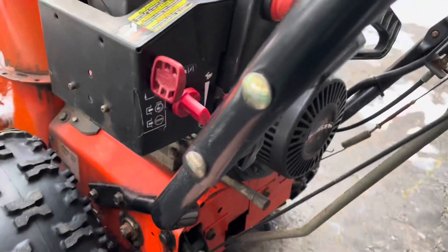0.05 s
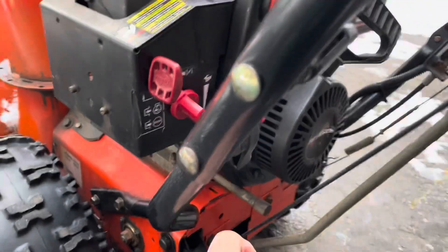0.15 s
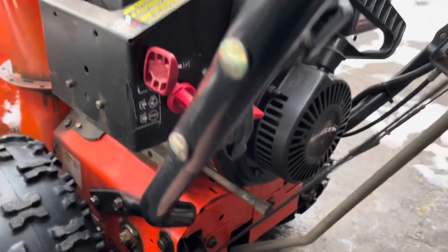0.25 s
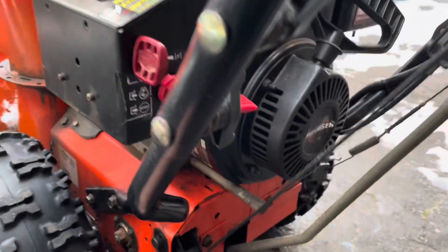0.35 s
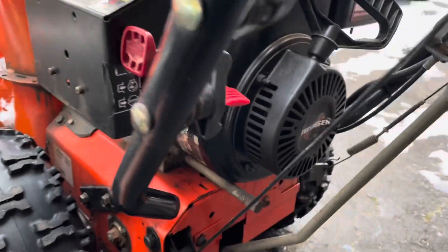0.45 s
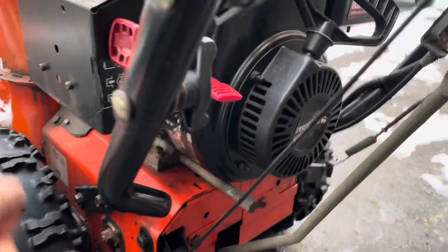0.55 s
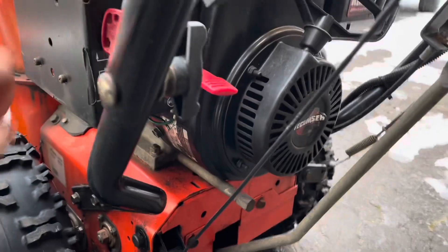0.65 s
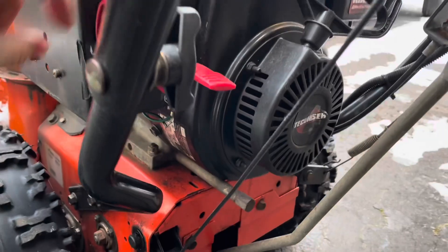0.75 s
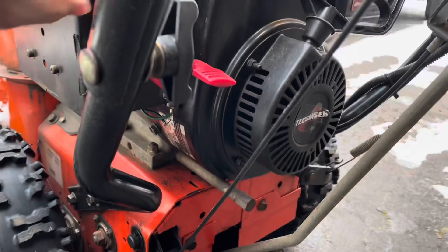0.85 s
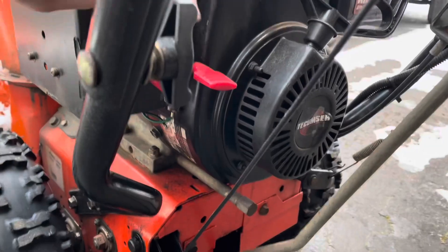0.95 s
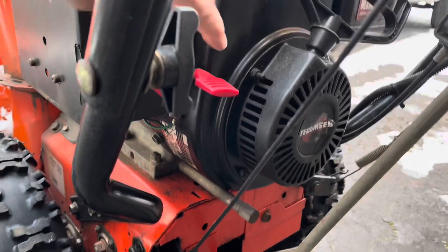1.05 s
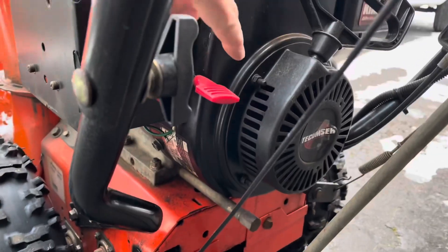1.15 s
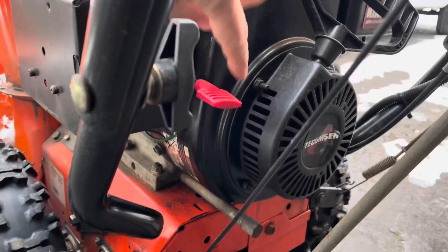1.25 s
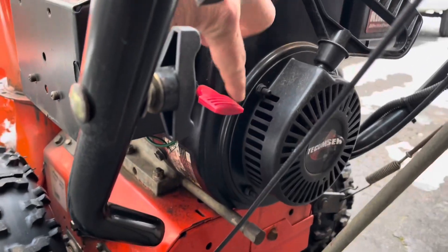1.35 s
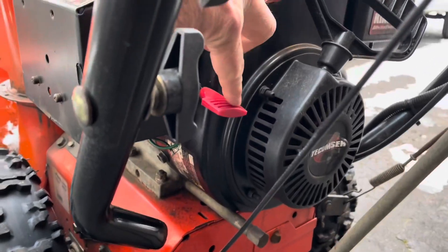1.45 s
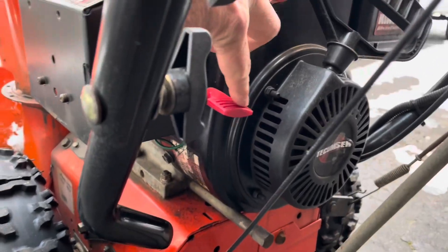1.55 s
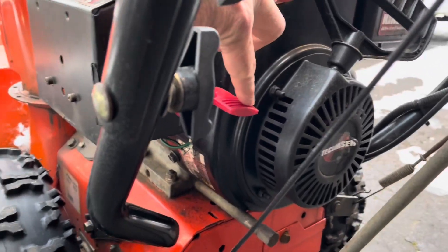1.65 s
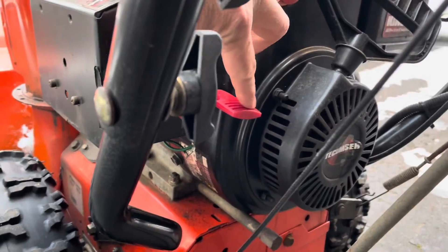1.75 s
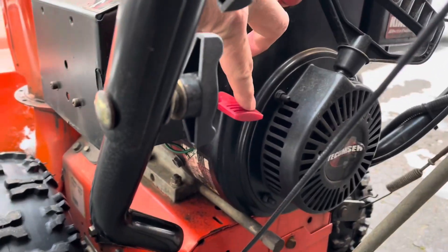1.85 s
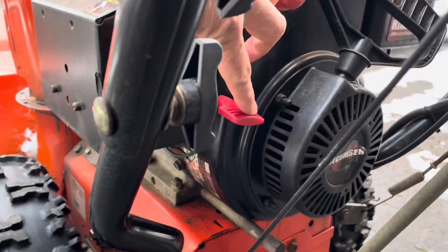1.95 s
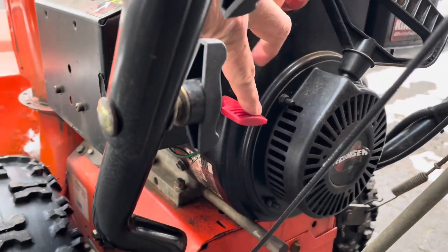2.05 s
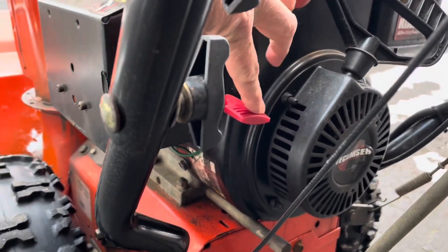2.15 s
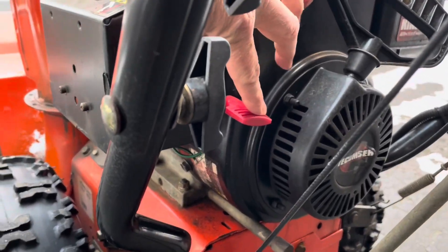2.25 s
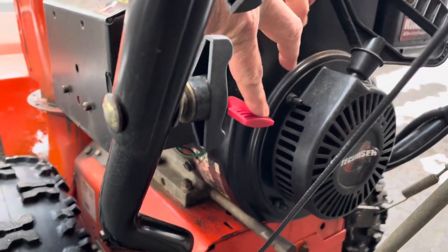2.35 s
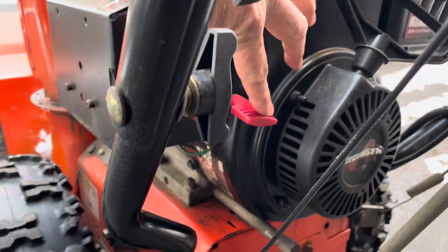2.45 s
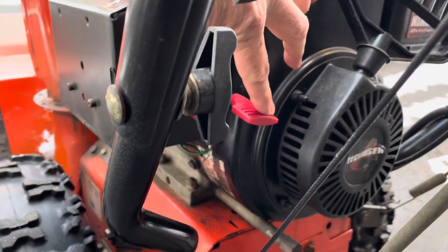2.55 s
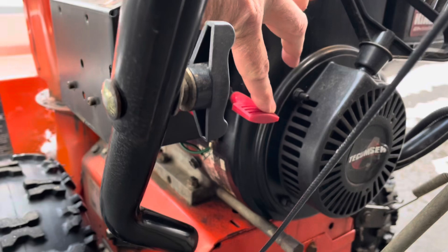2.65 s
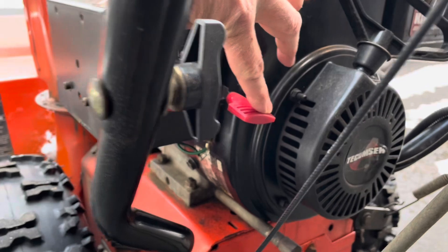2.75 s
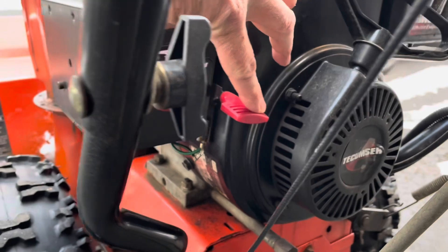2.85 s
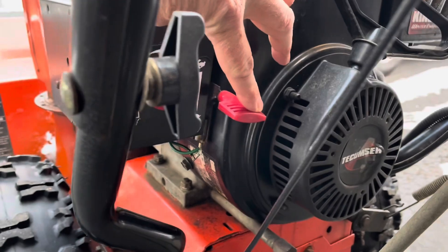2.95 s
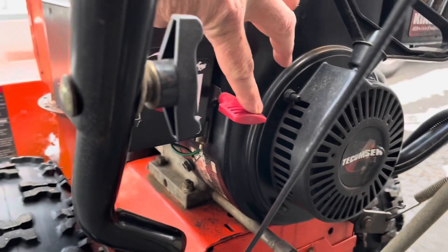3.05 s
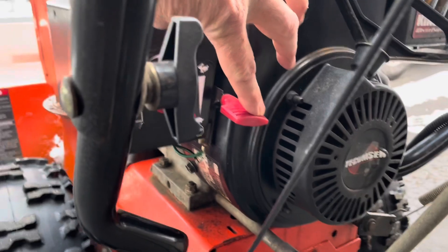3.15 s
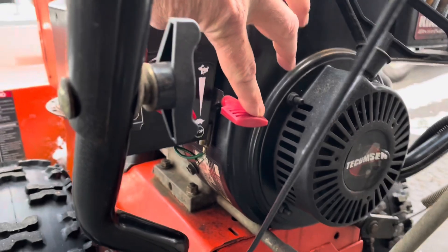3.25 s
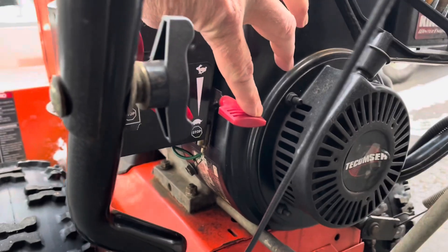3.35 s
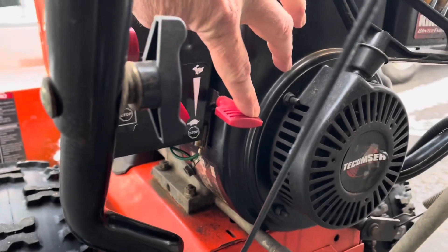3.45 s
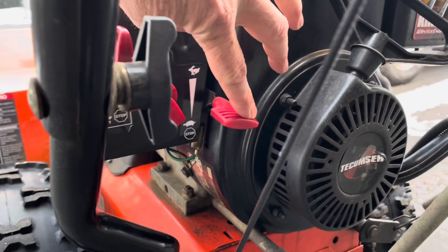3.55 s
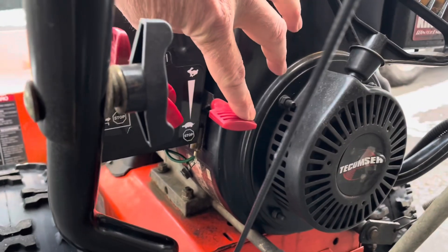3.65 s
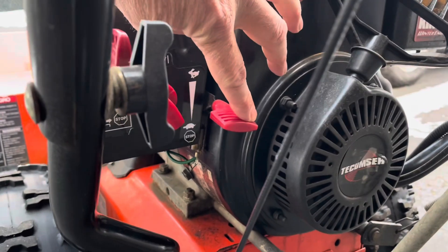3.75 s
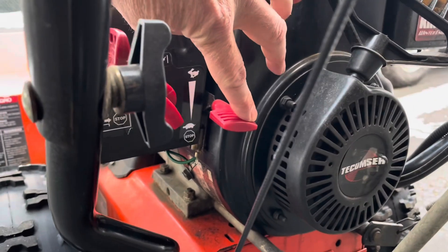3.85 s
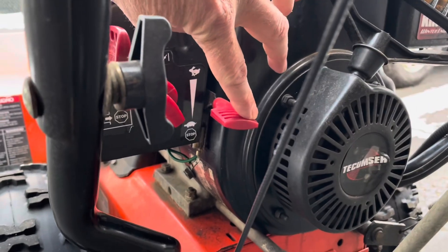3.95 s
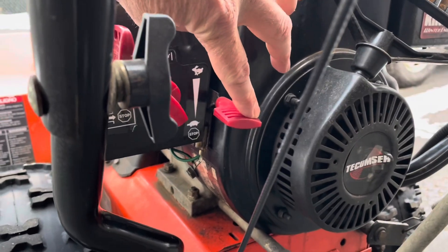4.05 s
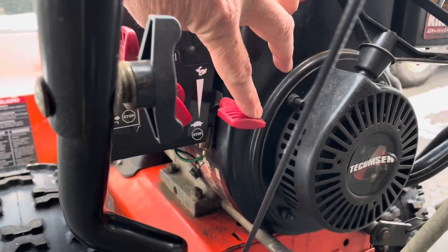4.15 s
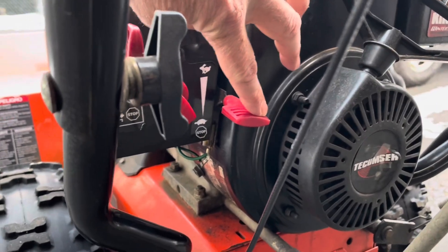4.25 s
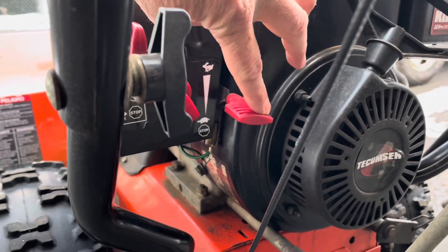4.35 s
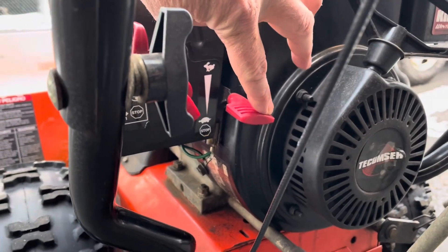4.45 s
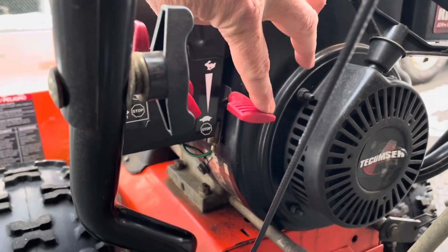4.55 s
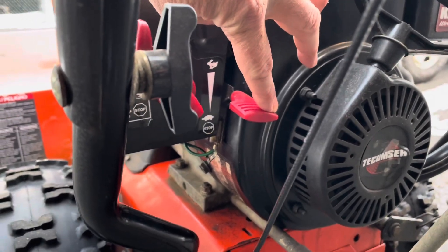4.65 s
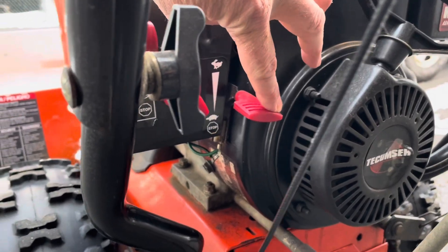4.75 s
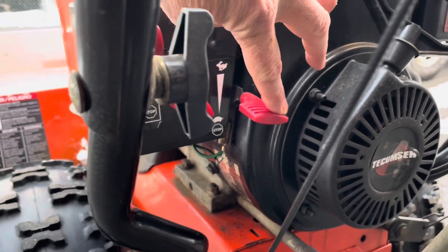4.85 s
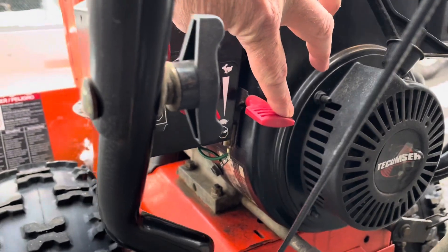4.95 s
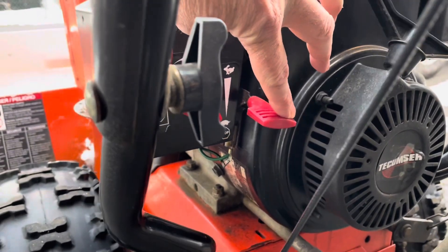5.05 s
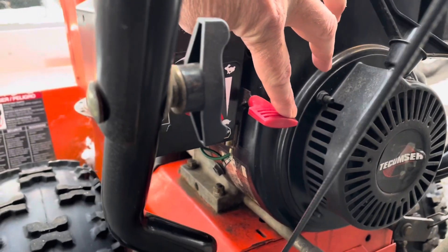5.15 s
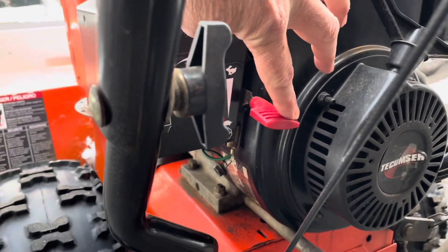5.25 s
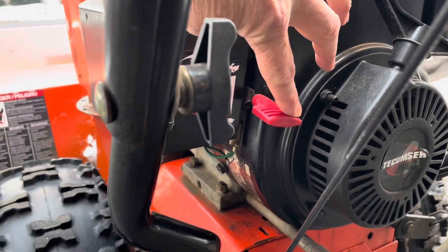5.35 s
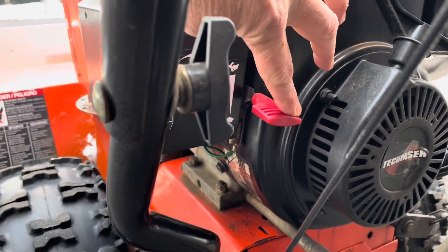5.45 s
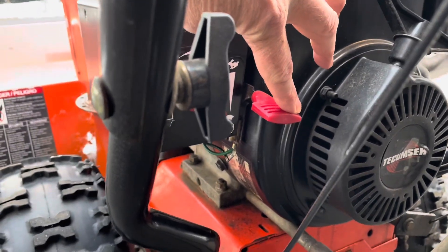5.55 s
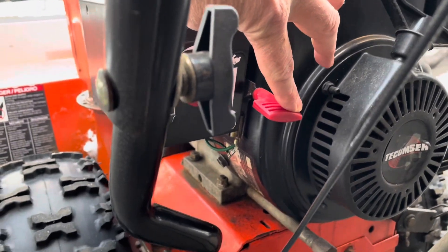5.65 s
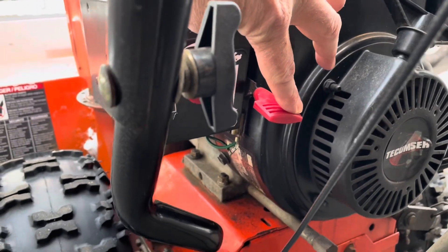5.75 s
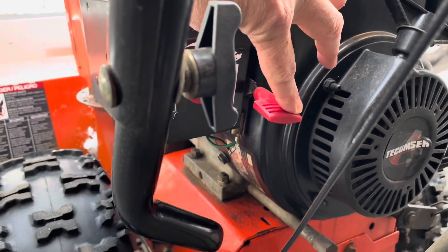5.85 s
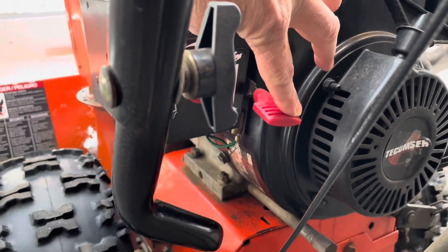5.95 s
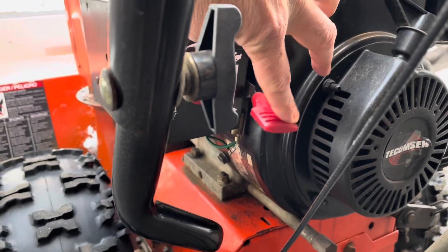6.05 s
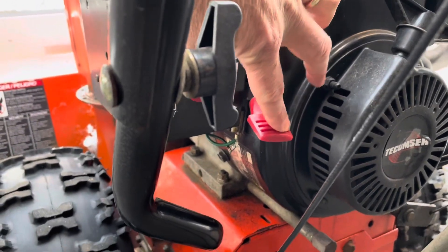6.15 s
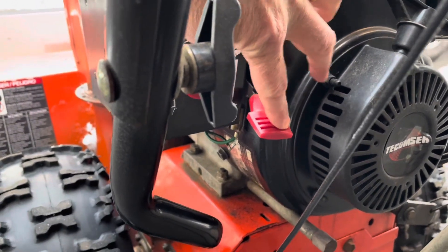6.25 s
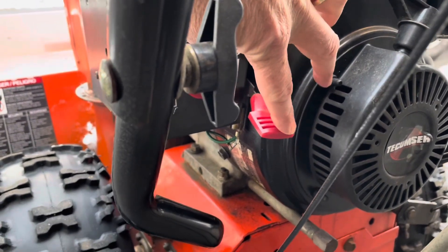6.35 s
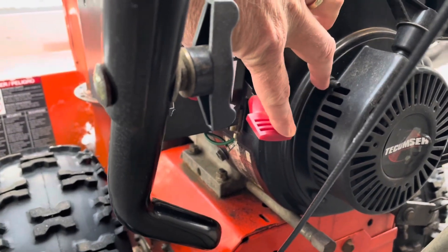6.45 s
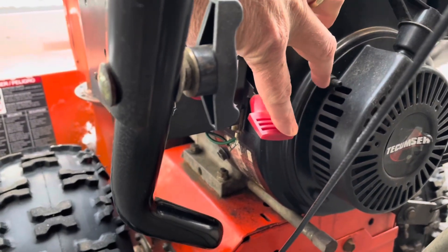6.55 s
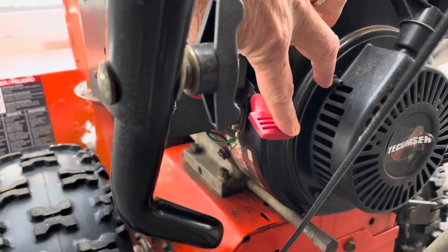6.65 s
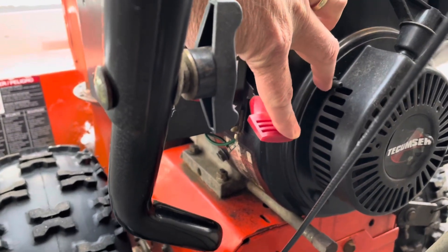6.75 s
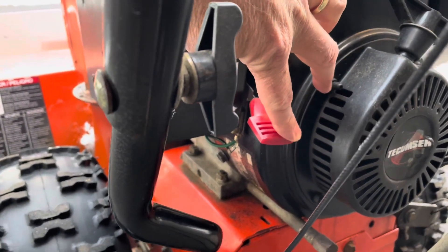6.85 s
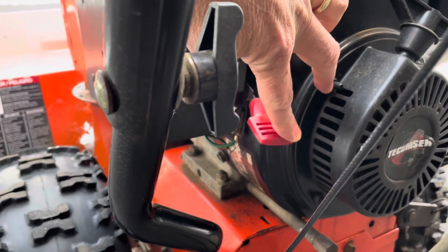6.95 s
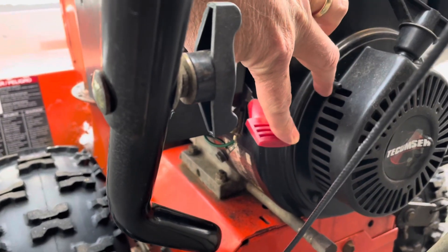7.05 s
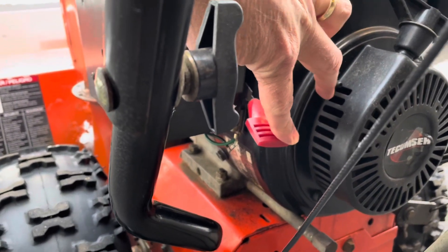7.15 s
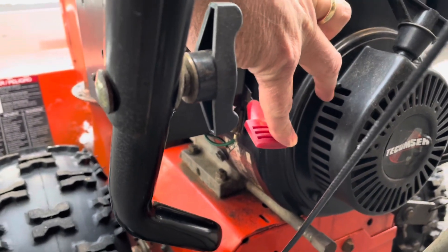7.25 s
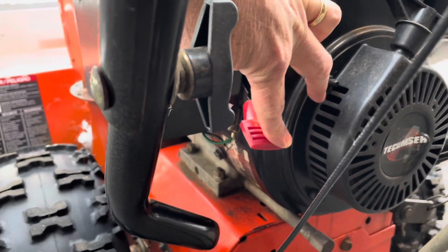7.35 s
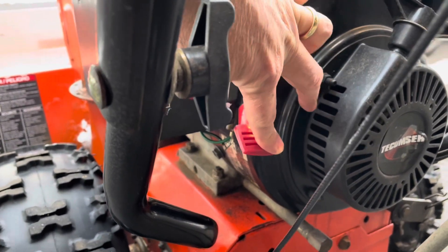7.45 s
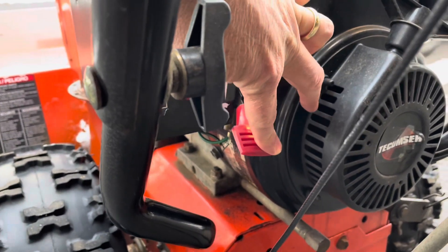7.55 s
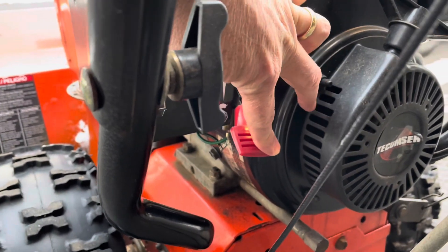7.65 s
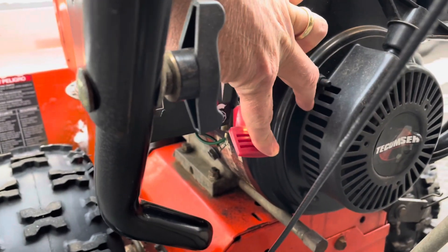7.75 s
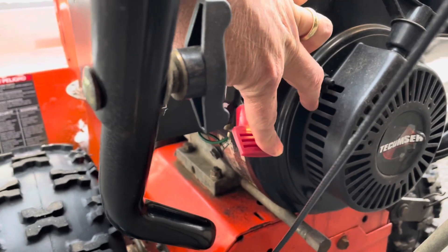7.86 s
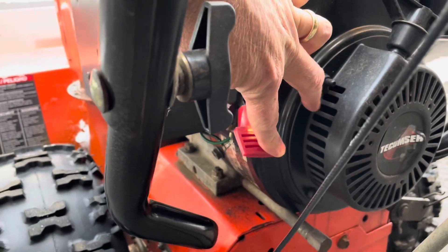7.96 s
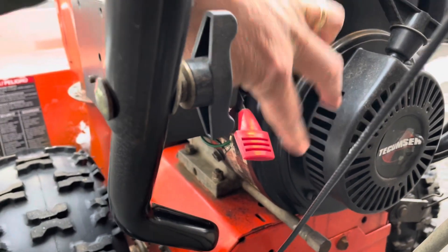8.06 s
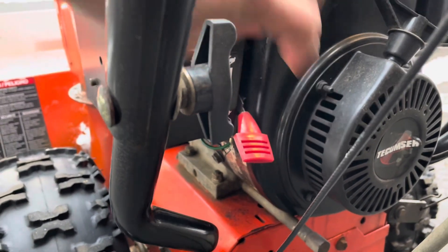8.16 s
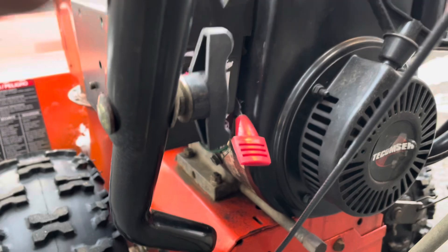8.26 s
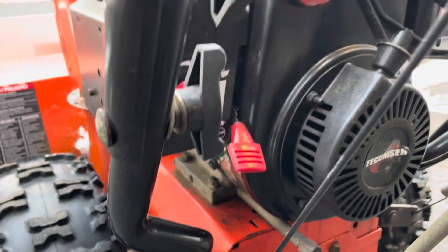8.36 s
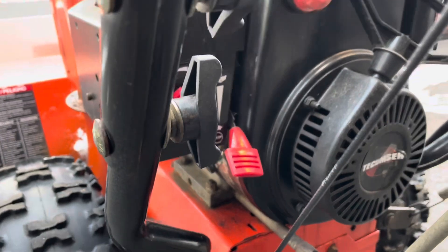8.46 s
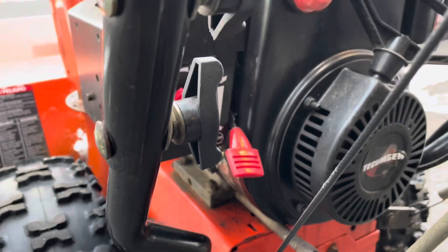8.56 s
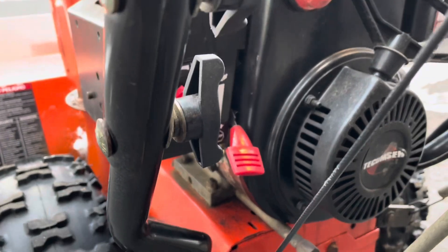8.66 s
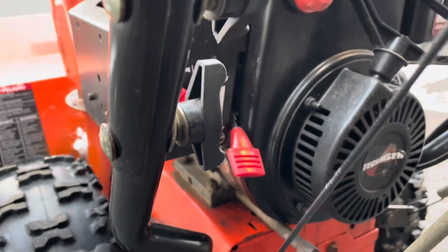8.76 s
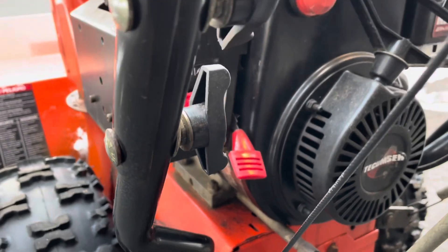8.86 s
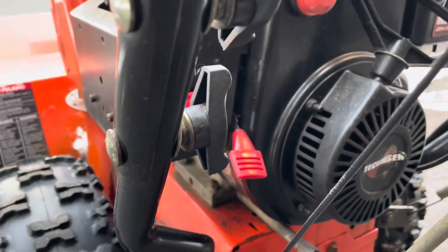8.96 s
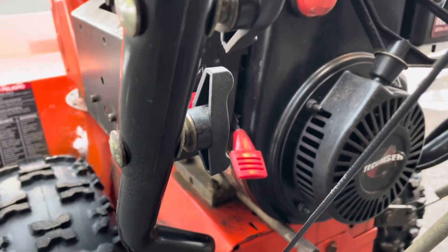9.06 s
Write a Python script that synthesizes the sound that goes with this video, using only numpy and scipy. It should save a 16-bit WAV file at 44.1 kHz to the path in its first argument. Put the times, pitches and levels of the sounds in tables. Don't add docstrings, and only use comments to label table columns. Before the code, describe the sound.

A small single-cylinder engine idles close by outdoors, its low exhaust thumps coming about sixteen a second with raspy hiss, valve ticking and sheet-metal rattle. Some strokes misfire, giving softer, hollow puffs. After seven seconds the ignition is cut; cold puffs slow and spread apart, then a few irregular metallic clanks and scrapes fade into faint yard air. Hand-held phone, stereo, close.

```python
import sys
import numpy as np
from scipy import signal
from scipy.fft import rfft, irfft, next_fast_len
from scipy.io import wavfile
from scipy.ndimage import uniform_filter1d

SR = 44100
rng = np.random.default_rng(int(sys.argv[2]) if len(sys.argv) > 2 else 0)


def int16_out(signal):
    q = np.round(np.clip(np.atleast_2d(signal).T, -1, 1) * 32767)
    wavfile.write(sys.argv[1], SR, q.astype(np.int16))


def voltage_ratio(decibels):
    exponent = np.asarray(decibels, float) / 20
    return 10 ** exponent


N = 402191

CUT_S = 7.12
LIFT_S = .014
CLANK_RISE_S = 0.0028
FLAT = [(100, 0), (9000, 0)]
# (frequency [Hz], density [dB per Hz])
JET_SPECTRUM = [(300, -1), (480, 2.5), (600, -17.5), (800, -4.5), (1100, -12.5), (2000, -13), (3500, -16.5),
                (4400, -19.5), (5300, -22), (5800, -22), (6700, -23), (9000, -15.5), (13300, -36),
                (16000, -30)]
# (time [s], peak level [dB], ring [Hz], fall [s], broad scrape [dB])
CLANK_EVENTS = [(8.128, -29.5, 440, 0.007, -13), (8.175, -19.5, 960, 0.0088, -17.5),
                (8.293, -29, 416, 0.019, -11), (8.317, -21, 966, 0.0099, -17),
                (8.347, -25.5, 780, 0.032, -18), (8.375, -25, 407, 0.0084, -5),
                (8.385, -13, 1410, 0.0044, -19), (8.441, -25.5, 1420, 0.0025, -6),
                (8.489, -34, 453, 0.011, -25), (8.513, -25, 905, .013, -15), (8.568, -27.5, 930, .024, -17),
                (8.604, -27, 387, 0.014, -10.5), (8.626, -18.5, 1410, 0.0045, -15.5),
                (8.715, -24.5, 1400, 0.0074, -15.5), (8.827, -30.5, 1250, 0.0098, -24),
                (8.888, -29.5, 925, 0.0065, -20), (8.889, -32, 1450, 0.013, -26),
                (8.889, -36, 2300, .007, -27), (8.828, -38, 2400, .007, -26), (9.03, -63, 930, 0.021, 4)]


def evened(x):
    return x / np.sqrt(np.mean(x ** 2) + 1e-20)


def read(points, hz):
    f, value = np.transpose(points)
    return np.interp(np.log(hz + 1), np.log(f + 1), value)


def add(mix, s, sound):
    at = round(s * SR)
    part = mix[..., max(at, 0):at + sound.shape[-1]]
    part += sound[..., max(-at, 0):][..., :part.shape[-1]]


def burst(rise, fall):
    t = np.arange(round(8 * (rise + fall) * SR) + 2) / SR
    shape = (1 - np.exp(-t / rise)) ** 2 * np.exp(-t / fall)
    return shape / shape.max()


def ring(x, hz, width):
    return signal.lfilter(*signal.iirpeak(hz, hz / width, SR), x)


def port_noise(points, patchy_db):
    # (frequency [Hz], left-right coherence [0-1])
    coherence = [(100, .99), (500, .82), (1200, .68), (2500, .6), (5000, .55), (7500, .7), (8300, .97),
                 (9500, .97), (10200, .9), (13000, .97)]
    # (frequency [Hz], phase by which left leads [rad])
    phase_lead = [(0, 0), (2000, .3), (3000, 1), (5000, .6), (6500, -.8), (7700, -2.3), (8300, -3.14),
                  (9500, -3.14), (10000, -3.9), (11000, -4.8), (12200, -6.2), (16000, -6.3)]
    # (frequency [Hz], left-right level [dB])
    level_tilt = [(100, .3), (600, 1), (1500, -.3), (5000, 1.5), (8000, 0), (15000, 0)]
    frames, hz = N // 64 + 5, np.fft.rfftfreq(256, 1 / SR)
    a, b, c, d, patches = rng.standard_normal((frames, 129, 5)).T
    patches = uniform_filter1d(patches, size=3, axis=0)
    patches = evened(uniform_filter1d(patches, size=9, axis=1))
    same = np.clip(read(coherence, hz), -1, 1)[:, None]
    left = a + 1j * b
    right = same * left + np.sqrt(1 - same ** 2) * (c + 1j * d)
    right = right * np.exp(-1j * read(phase_lead, hz))[:, None]
    z = np.array([left, right / voltage_ratio(read(level_tilt, hz))[:, None]]) * voltage_ratio(patchy_db * patches)
    white = signal.istft(z, nperseg=256, noverlap=192)[1][:, :N]
    size = next_fast_len(N, True)
    colour = voltage_ratio(read(points, np.fft.rfftfreq(size, 1 / SR)))
    return evened(irfft(rfft(white, size) * colour, size)[:, :N])


def yard_air():
    # (frequency [Hz], density [dB per Hz])
    spectrum = [(18, -26), (36, 8), (141, 5), (394, -22), (702, -8), (3770, -27), (4780, -32), (9220, -17),
                (16000, -46)]
    return voltage_ratio(-61.5) * port_noise(spectrum, patchy_db=1.5)


def whine():
    # (frequency [Hz], level [dB])
    tones = [(897, -43.5), (604, -47.5)]
    fade_s = 1.0
    t = np.arange(N) / SR
    waver = evened(uniform_filter1d(rng.standard_normal(N), size=3000))
    fade = voltage_ratio(2.0 * waver) / (1 + (t / fade_s) ** 4)
    out = np.zeros(N)
    for hz, db in tones:
        turns = np.cumsum(hz * (1 + 0.0014 * waver)) / SR
        out += voltage_ratio(db + 3.5) * np.sin(2 * np.pi * turns)
    return fade * out


def leak(beats):
    # (time [s], level [dB], rise [s], fall [s])
    sighs = [
        (8.5, -57, .03, 0.041),
        (8.94, -55, 0.039, .04),
        (8.375, -36, .006, 0.0086),
        (8.605, -48, .012, 0.011),
        (8.712, -43, .006, .007),
    ]
    hz, width, leak_db = 13100, 3000, -5
    gate = np.zeros(N)
    for s, _, _, _, hiss_db in beats[beats[:, 0] > CUT_S]:
        add(gate, s - LIFT_S, voltage_ratio(hiss_db + leak_db) * burst(0.0022, 0.0019))
        add(gate, s - .01, voltage_ratio(hiss_db + leak_db - 22) * burst(.01, 0.053))
    for s, db, rise, fall in sighs:
        add(gate, s, voltage_ratio(db) * burst(rise, fall))
    air = port_noise(FLAT, patchy_db=2.0)
    return gate * evened(ring(ring(air, hz, width), hz, 2 * width) + .5 * ring(air, 13500, 200))


def clanks():
    rasp, out = port_noise(JET_SPECTRUM, patchy_db=4.5), np.zeros((2, N))
    for s, peak_db, hz, fall, scrape_db in CLANK_EVENTS:
        shape = burst(CLANK_RISE_S, max(fall, 1e-3))
        noise = rasp[:, round(s * SR):][:, :len(shape)]
        shape = shape[:noise.shape[1]]
        note = ring(evened(ring(noise, hz, 550)) * shape, hz, 234)
        scrape = (noise - ring(noise, 320, 470)) * shape
        add(out, s, voltage_ratio(peak_db) * (note + voltage_ratio(scrape_db + 8.0) * scrape))
    return out


def running_gear(beats):
    # (frequency [Hz], density [dB per Hz])
    casing_spectrum = [(60, 1), (100, 3.5), (280, -1), (460, -5.5), (600, -8.5), (900, -15.5), (1900, -17),
                       (3600, -26), (5300, -32.5), (6800, -27), (9000, -33), (13200, -31), (16000, -56)]
    # (frequency [Hz], width [Hz], level [dB])
    panel_modes = [(894, 336, 20.5), (1410, 88, 10.5), (1652, 210, 6.5), (3120, 58, -9), (3250, 100, -3.5),
                   (4440, 15, -23), (4790, 160, -36), (4870, 100, -38), (5800, 53, -38), (6050, 340, -9)]
    # (time [s], clatter level [dB], panel ringing level [dB])
    running = [(0.0, -31.5, -37), (0.4, -30, -35), (1.32, -34, -34), (2.84, -30.5, -32), (3.53, -29, -32),
               (4.42, -29.5, -31), (5.97, -27.5, -30.5), (6.12, -30.5, -29), (7.06, -27.5, -31),
               (8.31, -45.5, -36), (8.51, -46, -41.5), (8.66, -49, -44.5), (8.79, -51.5, -56),
               (8.99, -57, -54), (9.12, -63, -73)]
    s, clatter_db, panel_db = np.transpose(running)
    t = np.arange(N) / SR
    knocks = voltage_ratio(1.24 * np.minimum(rng.exponential(1, N), 4)) * (rng.random(N) < 220 / SR)
    shake = evened(6.3 + signal.oaconvolve(knocks, burst(0.0002, 0.0034))[:N])
    beat = np.interp(t, beats[:, 0], np.arange(len(beats)))
    shake *= voltage_ratio(1.7 * np.cos(2 * np.pi * (beat - .2)) + 0.54 * np.cos(4 * np.pi * (beat - .1)))
    casing = shake * port_noise(casing_spectrum, patchy_db=5.0)
    casing += voltage_ratio(19.5) * np.clip(t - 2.2, .3, 1) * ring(casing, 5330, 60) \
        + voltage_ratio(14.5) * ring(casing, 3770, 70) + voltage_ratio(8.0) * ring(casing, 1862, 49)
    drive = shake * port_noise(FLAT, patchy_db=1.5)
    panels = evened(sum(voltage_ratio(db) * ring(drive, hz, w) for hz, w, db in panel_modes))
    return voltage_ratio(np.interp(t, s, clatter_db) - 0.5) * casing + voltage_ratio(np.interp(t, s, panel_db)) * panels


def valve_knocks(beats):
    # (frequency [Hz], width [Hz], level [dB])
    valve_modes = [(1250, 30, 6), (1420, 15, 3.5), (2360, 24, -5), (2940, 93, 0.5), (3200, 37, -2.5),
                   (3550, 74, -18), (4383, 82, -9.5), (4616, 33, -3.5), (5400, 43, -30)]
    gate = np.zeros(N)
    for s, fired, _, _, hiss_db in beats:
        coasting = s > CUT_S
        early = .0075 if fired else .016 if s < CUT_S else LIFT_S
        knock_db = hiss_db + 5 - 5.4 * fired + 2.7 * coasting
        add(gate, s - early, voltage_ratio(knock_db) * burst(0.002, 0.0041 + 0.0035 * coasting))
    for s, peak_db, hz, fall, scrape_db in CLANK_EVENTS:
        knock_db = peak_db + scrape_db + 3.0 + 2.9 * (hz > 1300)
        add(gate, s, voltage_ratio(knock_db) * burst(CLANK_RISE_S, max(fall, 1e-3)))
    drive = gate * port_noise(FLAT, patchy_db=3.0)
    return voltage_ratio(11.5) * sum(voltage_ratio(db) * ring(drive, hz, w) for hz, w, db in valve_modes)


def strokes():
    # (time [s], exhaust strokes counted, level [dB])
    crank = [(.0219, 0, -3.4), (.6106, 10, -2), (.911, 15, -1.7), (1.2203, 20, -.8), (1.6643, 27, -1),
             (2.5607, 41, 0), (2.8777, 46, .5), (3.198, 51, .3), (3.9137, 62, .8), (4.5048, 71, 1.3),
             (4.7647, 75, 1.5), (5.9878, 94, 2.1), (6.3661, 100, 1.8), (6.5572, 103, 1.7),
             (6.9557, 109, 1.6), (7.0908, 111, 1.6)]
    # (time [s], burn [dB])
    burns = [(.022, 9.5), (.492, -2.5), (.552, 4.5), (.791, -2.5), (1.22, 3.5), (1.283, -6.5), (1.729, -2),
             (2.049, 1), (2.241, 3), (2.369, 2), (2.687, 1.5), (2.814, 2.5), (2.878, -1.5), (3.263, 3.5),
             (3.784, 1.5), (3.914, -6), (4.177, -0.5), (4.373, 1), (4.57, -8.5), (4.7, 4), (4.829, 0),
             (4.894, 2), (5.023, -2), (5.472, 2.5), (5.602, 6), (5.988, 4), (6.366, -6), (6.43, 2),
             (6.557, -5), (7.023, 2)]
    # (time [s], thump [dB], bark [dB], hiss [dB])
    misses = [(.6795, -2.5, -18, -32.5), (0.9823, -3, -5, -34), (1.102, -12, -13, -36.5),
              (3.1407, 2, 4, -35.5), (3.4025, -1.5, -2, -32), (3.53, 0, -9, -37), (4.4479, 1, -3, -30),
              (5.222, -3.7, 8, -37), (5.5464, 2, 0, -31.5), (5.6767, -0.5, 5, -31), (5.8038, 1.1, -6, -30),
              (5.9328, 0.5, 0, -31), (6.1243, -2, 15, -31.5), (6.6294, 1.5, -9, -31),
              (8.387, -6.5, 0.5, -51), (8.617, -12, -10, -48), (8.736, -10.7, -9, -46)]
    at, count, level_db = np.transpose(crank)
    s = np.interp(np.arange(count[-1] + 1), count, at)
    level, burn = np.interp(s, at, level_db), np.zeros(len(s))
    for when, burn_db in burns:
        burn[abs(s - when).argmin()] = burn_db
    weak, hard = np.minimum(burn, 0), np.maximum(burn, 0)
    luck = rng.standard_normal((len(s), 3)).T
    thump_db = level + weak + 0.24 * luck[0]
    bark_db = -0.47 + 0.74 * level + 0.27 * weak + 0.11 * luck[1]
    hiss_db = -31 + 0.9 * level + weak + .7 * hard + .8 * luck[2]
    fired = np.transpose([s, voltage_ratio(weak), thump_db, bark_db, hiss_db])
    missed = np.insert(np.array(misses), 1, 0, axis=1)
    fired = fired[abs(s[:, None] - missed[:, 0]).min(axis=1) > .02]

    u = np.arange(0, 1.6, 1e-4)
    turned = 14.7948 * u - 8.5986 * u ** 2 / 2 + .765 * u ** 3 / 3
    u = np.interp(np.arange(13) + .7083, turned, u)
    thump_db = -7.5 * np.maximum(u - 0.78, 0) + 4 * (u == u[0])
    bark_db = 1.4 + 1.9 * rng.standard_normal(len(u))
    coast = np.transpose([CUT_S + u, 0 * u, thump_db, bark_db, -27 - 5 * u])
    rows = np.vstack([fired, missed, coast])
    return rows[rows[:, 0].argsort()]


def flutter(beats):
    gate = np.zeros(N)
    for s, fired, thump_db, _, _ in beats:
        add(gate, s - .014, (1 - fired) * voltage_ratio(thump_db - 25) * burst(0.0033, 0.024))
    air = gate * rng.standard_normal(N)
    low = ring(ring(air, 246, 100), 246, 100)
    high = ring(ring(air, 486, 82), 486, 82)
    return voltage_ratio(18.0) * (low + voltage_ratio(-7.0) * high)


def jet(beats):
    gate = np.zeros(N)
    for s, fired, _, _, hiss_db in beats:
        if fired:
            add(gate, s - .0105, voltage_ratio(1.3 * (hiss_db + 27.5) - 24.5) * burst(0.0038, 0.0046))
            add(gate, s + 0.0018, voltage_ratio(0.23 * (hiss_db + 3.0) - 33.5) * burst(0.0052, 0.027))
        else:
            slow_db = hiss_db - 5.0 * max(s - CUT_S, 0) - 4.5 * (s > CUT_S)
            early = .0175 if s < CUT_S else LIFT_S
            add(gate, s - early, voltage_ratio(slow_db + 1.5) * burst(0.005, 0.0061))
            add(gate, s - .005, voltage_ratio(slow_db) * burst(0.0012, 0.021))
    sputter = voltage_ratio(2.2 * evened(uniform_filter1d(rng.standard_normal(N), size=60)))
    air = port_noise(JET_SPECTRUM, patchy_db=3.5)
    # Hz, width Hz, dB
    holes = [(2820, 54, 0.47), (3400, 340, 1.2), (4880, 46, 1),
             (5090, 170, 7.0), (6690, 250, 4.8), (13100, 2000, 3.5)]
    whistle = sum(voltage_ratio(db) * ring(air, hz, w) for hz, w, db in holes)
    return voltage_ratio(5.0) * gate * sputter * (air + whistle)


def muffler(modes, turns, phase_turn, lead, soft_hz):
    hz = np.fft.rfftfreq(8192, 1 / SR) + 1e-3
    sweep = np.exp(-2j * np.pi * (turns * np.log(hz / 300) + phase_turn + hz * (.03 - lead)))
    sweep /= (1 + (40 / hz) ** 4) * (1 + (hz / soft_hz) ** 6)
    notes = [voltage_ratio(db) * 1j * hz * w / (f * f - hz * hz + 1j * hz * w) * sweep for f, w, db in modes]
    return irfft(sum(notes[:2])), irfft(sum(notes[2:]))


def exhaust(beats):
    # (frequency [Hz], width [Hz], level [dB])
    fired_modes = [(72, 14, 39), (126, 45, 35.4), (331, 250, 37.9), (422, 80, 35)]
    # (frequency [Hz], width [Hz], level [dB])
    missed_modes = [(58, 8, 40.9), (106, 35, 39.1), (276, 200, 34)]
    # (frequency [Hz], width [Hz], level [dB])
    coasting_modes = [(79, 32, 36.1), (117, 65, 30.9), (220, 55, 30)]
    # (sweep [turns], phase turn [turns], lead [s], softness [Hz])
    fronts = [
        (1.1, .969, .0046, 332),
        (.49, .262, .0065, 203),
        (.234, .712, .0043, 195),
    ]
    # (time [s], level [dB])
    late_burns = [
        (3.133, -4.5),
        (3.523, -3),
        (6.623, -1),
    ]
    sag, damping = .4, 1.7
    out, t = np.zeros(N), np.arange(1500) / SR
    chance = rng.standard_normal((len(beats), 5))
    for (s, fired, thump_db, bark_db, _), drift in zip(beats, chance):
        kind = 0 if fired else 1 if s < CUT_S else 2
        modes = (fired_modes, missed_modes, coasting_modes)[kind]
        modes = [(f * (1 + 0.004 * d), w, db) for (f, w, db), d in zip(modes, drift)]
        if fired:
            weak_db = 4.9 * damping * np.log10(fired)
            modes[2:] = [(f * (1 - sag * (1 - fired)), w * fired ** damping, db - weak_db)
                         for f, w, db in modes[2:]]
        thump, bark = muffler(modes, *fronts[kind])
        add(out, s - .03, voltage_ratio(thump_db) * thump + voltage_ratio(bark_db) * bark)
        add(out, s - .004, (kind == 2) * voltage_ratio(thump_db - 9 - 5.0 * (s - CUT_S)) * thump)
        pop = np.sin(2 * np.pi * 770 * (1 + 0.076 * drift[-1]) * t)
        pop *= (1 - np.exp(-t / 0.0029)) * np.exp(-t / 0.0027)
        low = np.sin(2 * np.pi * 475 * (1 + .02 * drift[-2]) * t)
        low *= (1 - np.exp(-t / .0015)) * np.exp(-t / .005)
        add(out, s - .0037, fired * voltage_ratio(bark_db + thump_db - 15.5) * low)
        add(out, s - .006, fired * voltage_ratio(bark_db - 8.0) * pop)
        add(out, s + 0.0092, fired * voltage_ratio(bark_db - 15) * pop)
    for s, db in late_burns:
        add(out, s - .03, -voltage_ratio(db) * muffler(fired_modes, *fronts[0])[1])
    return out


def at_both_ports(pulses):
    direct = pulses * voltage_ratio(np.array([[.25], [-.25]]))
    wall = np.zeros((2, 2000))
    wall[[0, 1], [500, 760]] = voltage_ratio(-23.0)
    return direct + signal.oaconvolve(pulses[None], wall, axes=1)[:, :N]


def scene():
    beats = strokes()
    background = yard_air() + whine() + leak(beats)
    metal = clanks() + running_gear(beats) + valve_knocks(beats)
    pulses = flutter(beats) + exhaust(beats)
    return background + metal + jet(beats) + at_both_ports(pulses)


def band_limit(x):
    return signal.sosfilt(signal.butter(12, 16620, fs=SR, output="sos"), x)


def record(dry):
    edge = signal.firwin(255, 15800, fs=SR)
    bass = signal.sosfiltfilt(signal.butter(2, 29, "highpass", fs=SR, output="sos"), dry)
    return band_limit(signal.oaconvolve(bass, edge[None], "same"))


dry = scene()
out = record(dry)
int16_out(out)
```